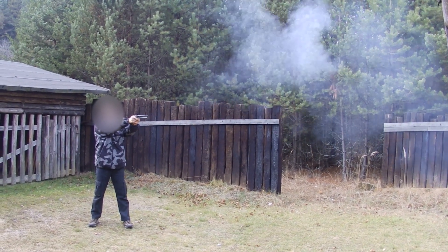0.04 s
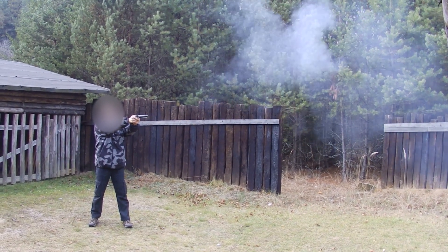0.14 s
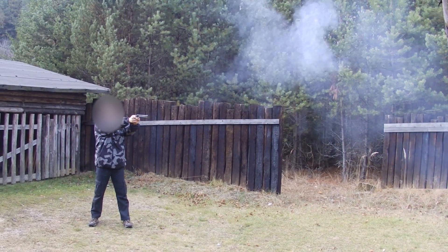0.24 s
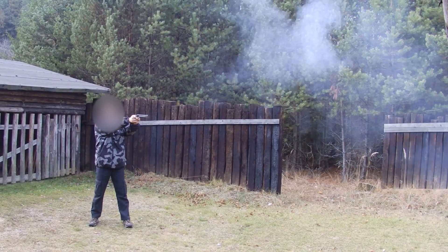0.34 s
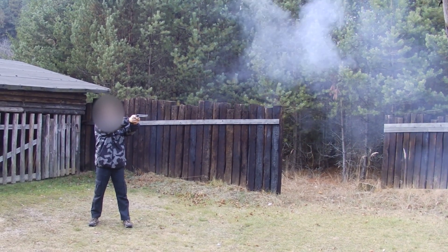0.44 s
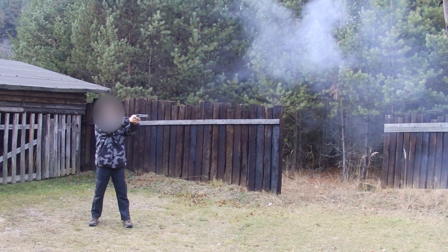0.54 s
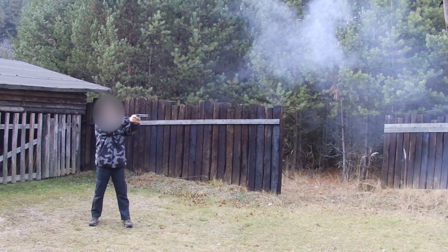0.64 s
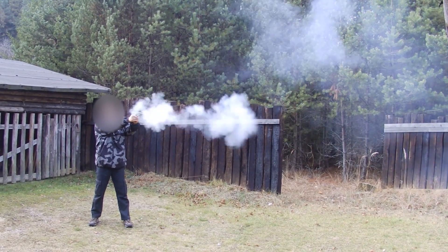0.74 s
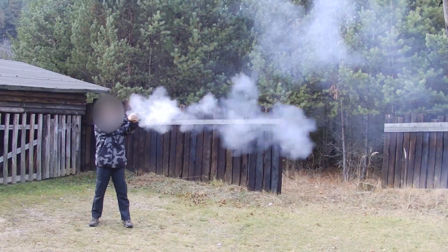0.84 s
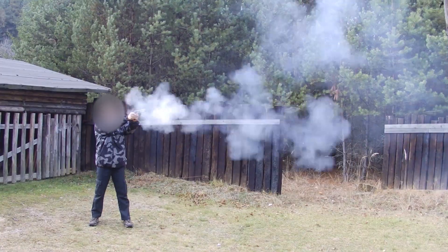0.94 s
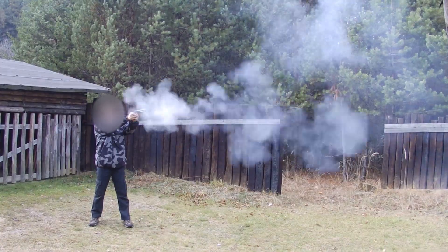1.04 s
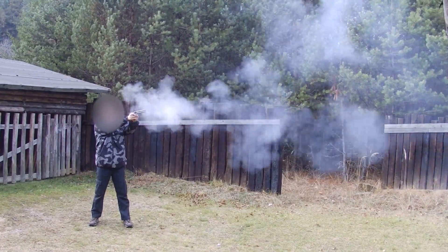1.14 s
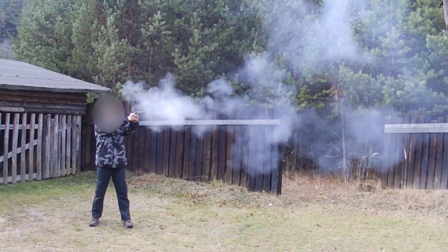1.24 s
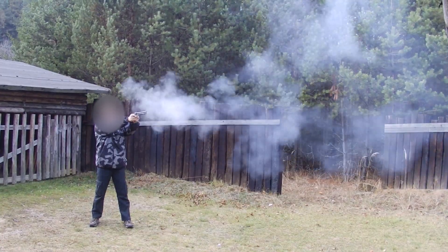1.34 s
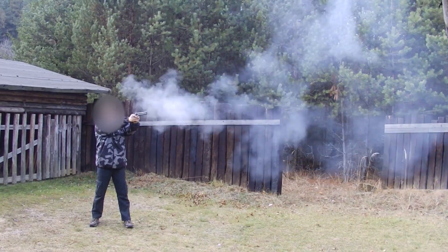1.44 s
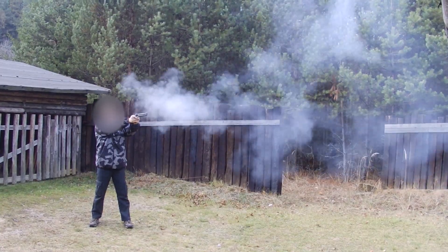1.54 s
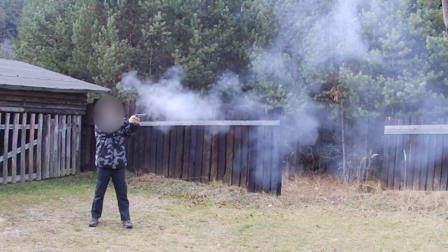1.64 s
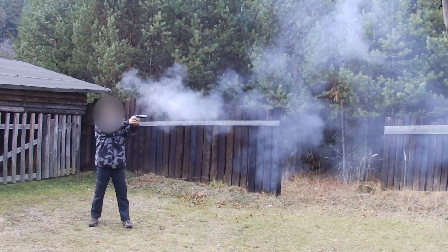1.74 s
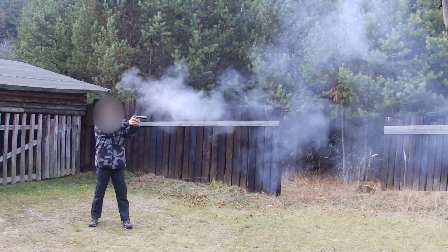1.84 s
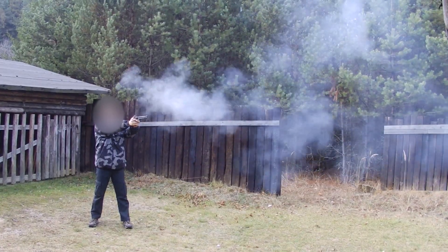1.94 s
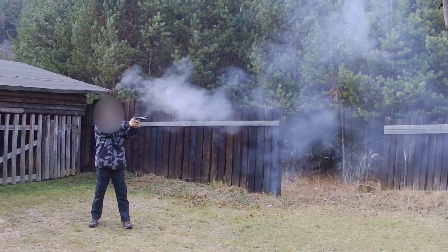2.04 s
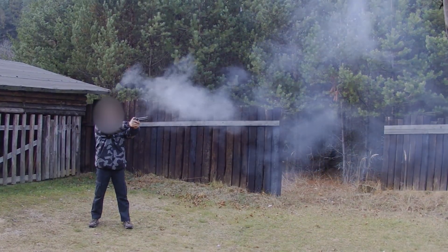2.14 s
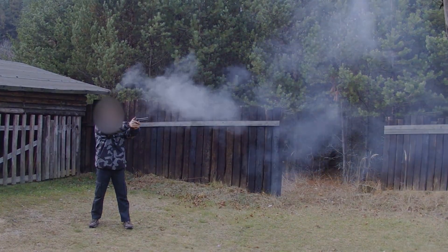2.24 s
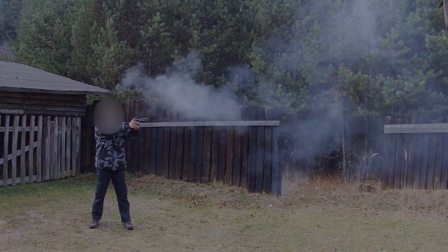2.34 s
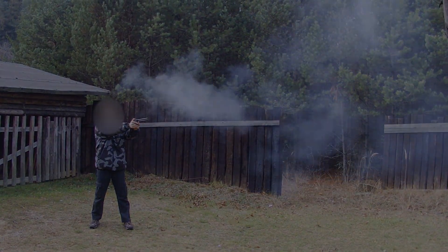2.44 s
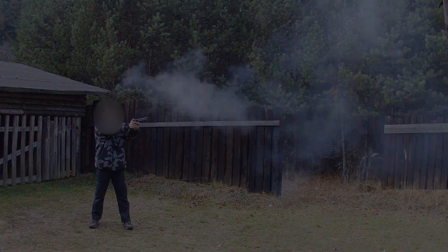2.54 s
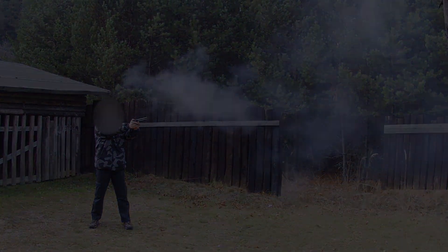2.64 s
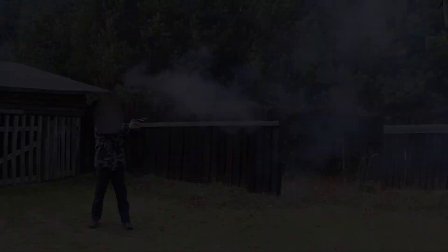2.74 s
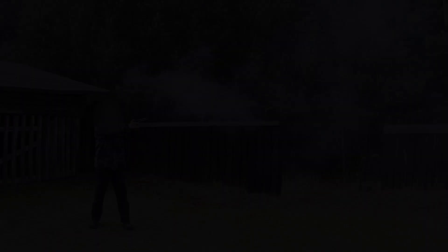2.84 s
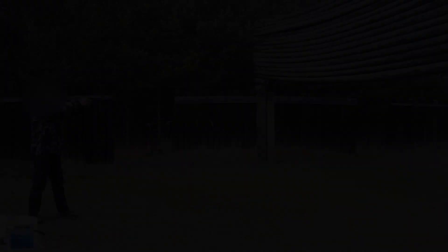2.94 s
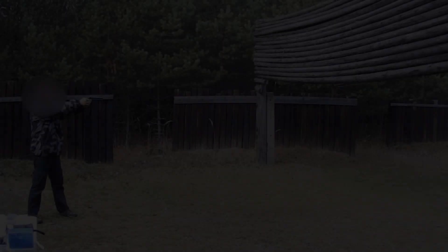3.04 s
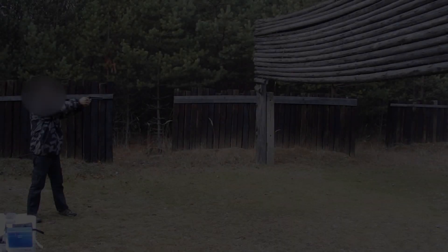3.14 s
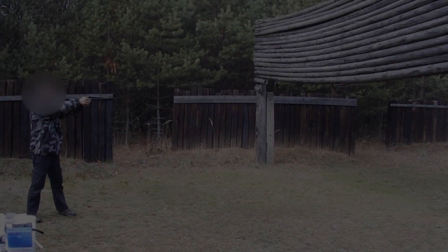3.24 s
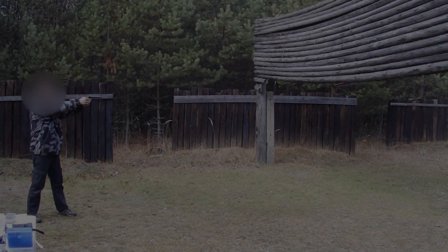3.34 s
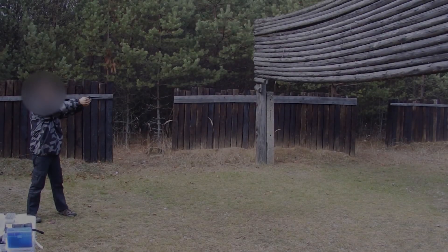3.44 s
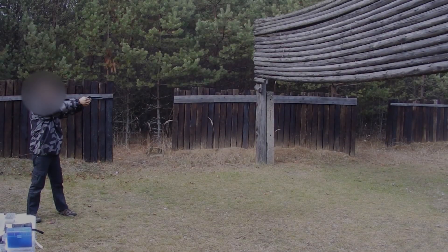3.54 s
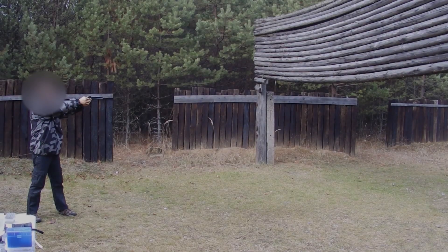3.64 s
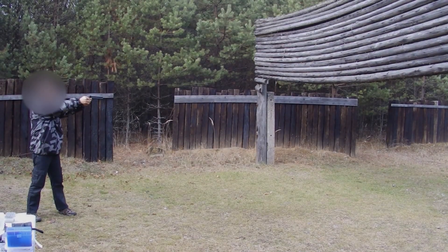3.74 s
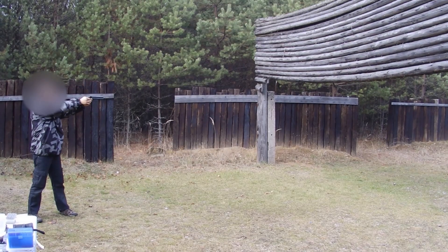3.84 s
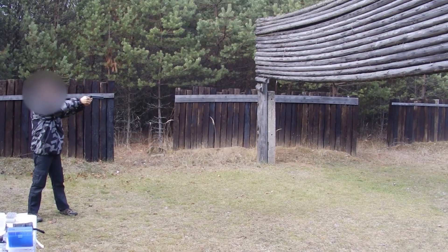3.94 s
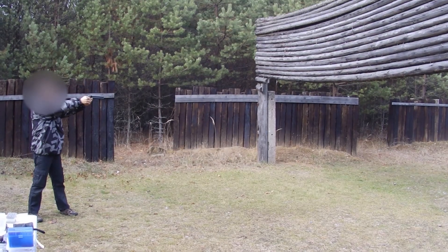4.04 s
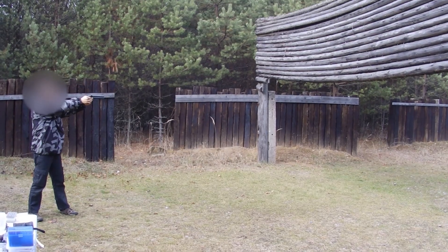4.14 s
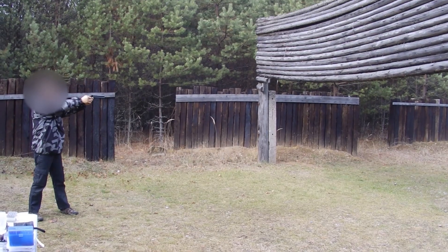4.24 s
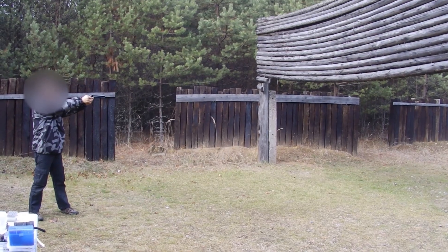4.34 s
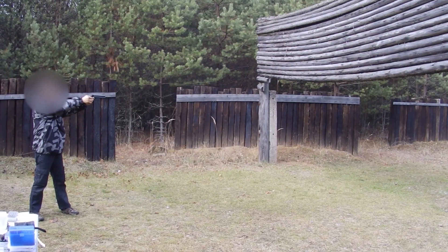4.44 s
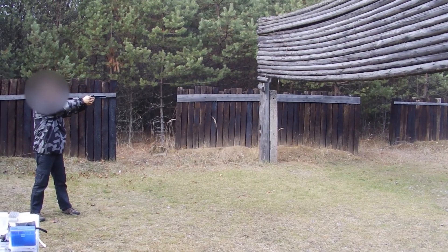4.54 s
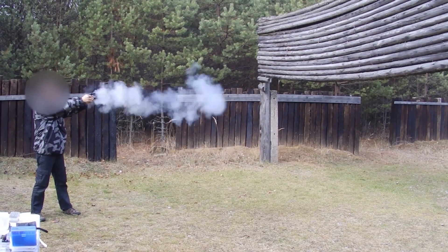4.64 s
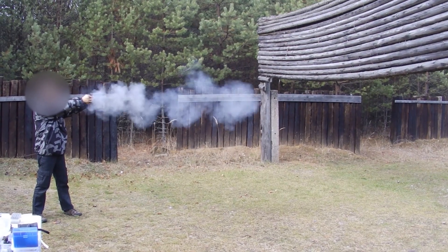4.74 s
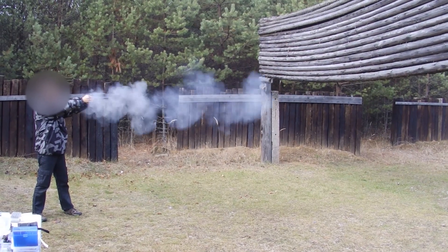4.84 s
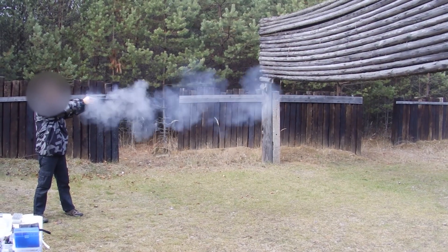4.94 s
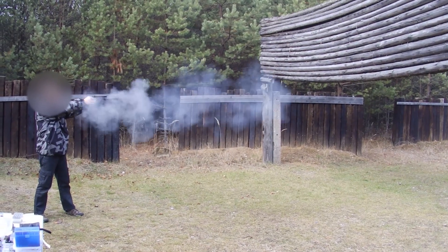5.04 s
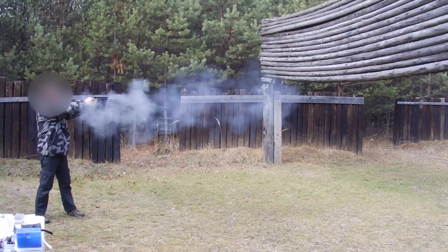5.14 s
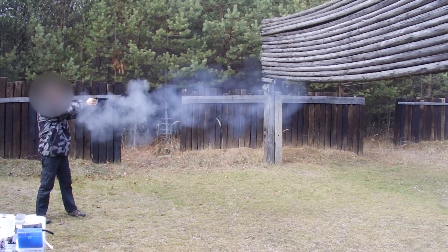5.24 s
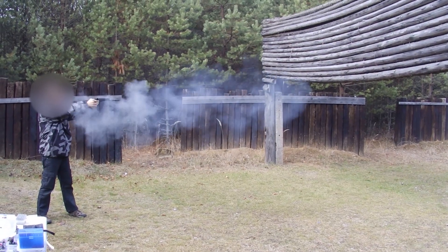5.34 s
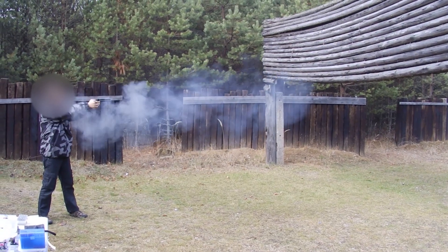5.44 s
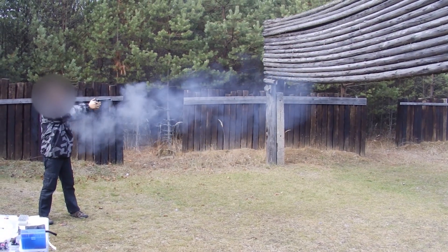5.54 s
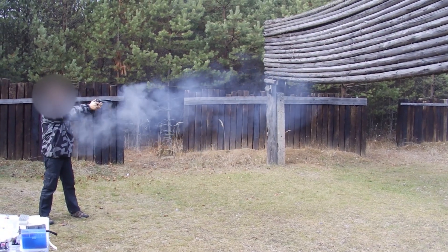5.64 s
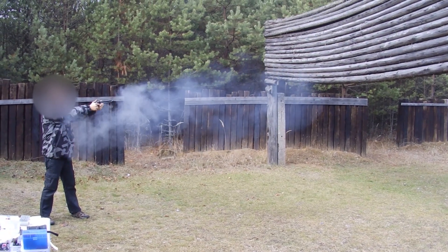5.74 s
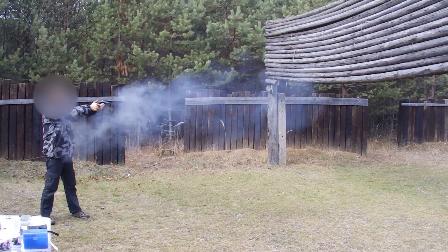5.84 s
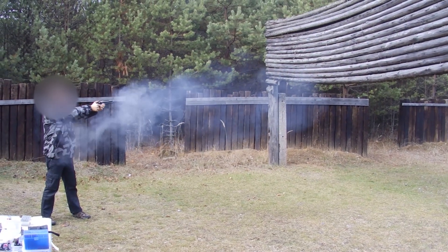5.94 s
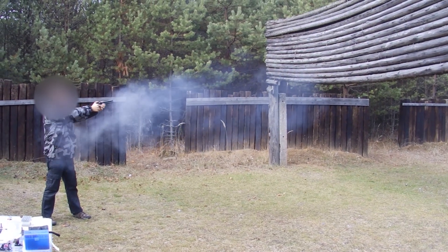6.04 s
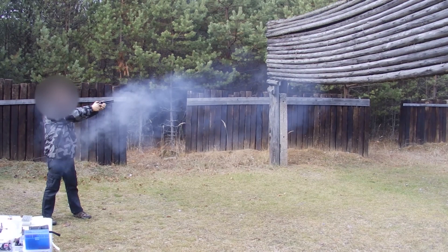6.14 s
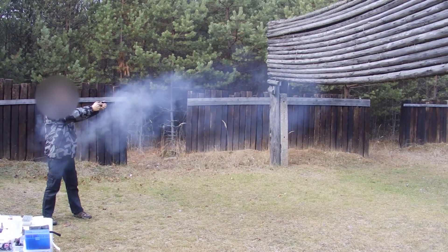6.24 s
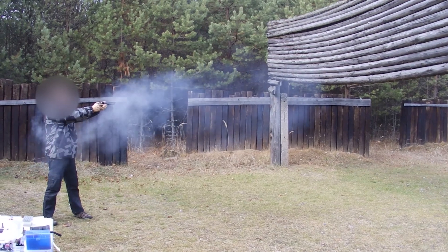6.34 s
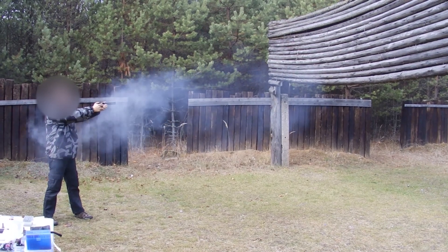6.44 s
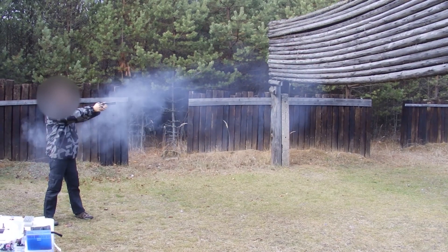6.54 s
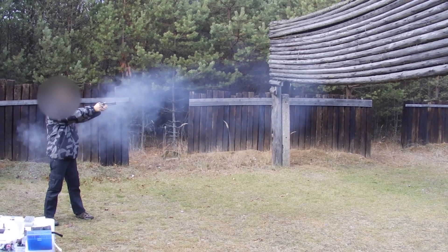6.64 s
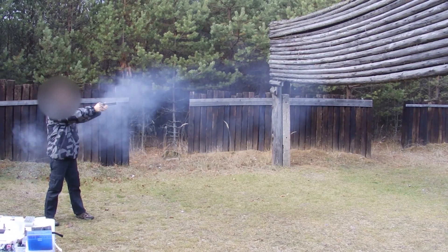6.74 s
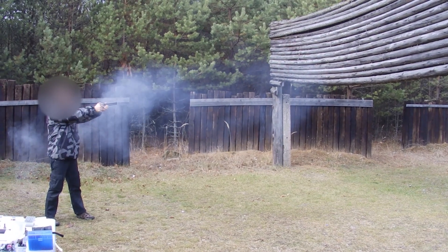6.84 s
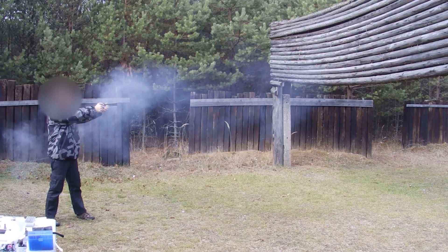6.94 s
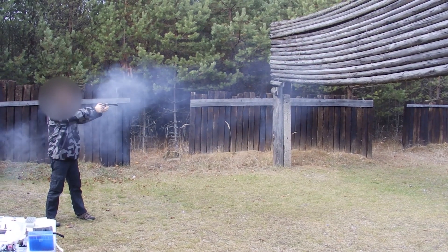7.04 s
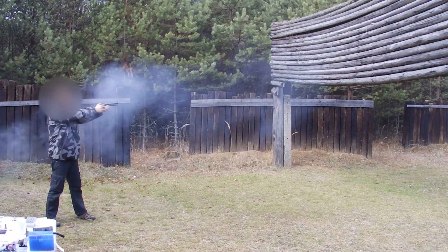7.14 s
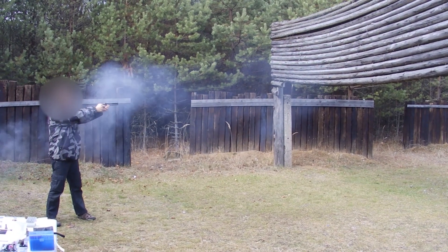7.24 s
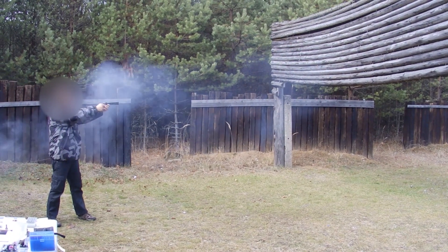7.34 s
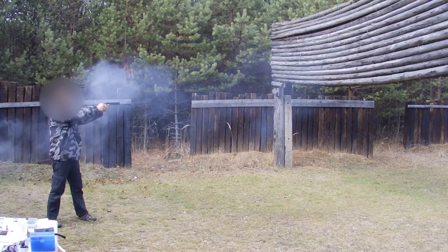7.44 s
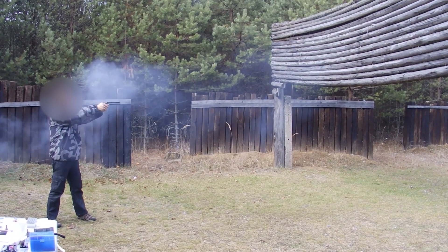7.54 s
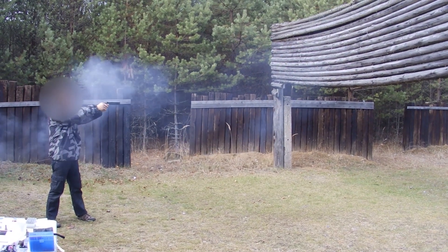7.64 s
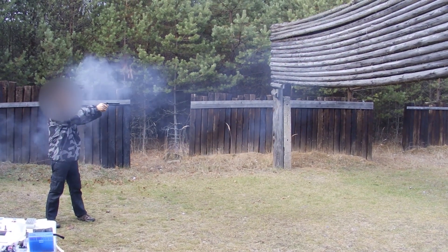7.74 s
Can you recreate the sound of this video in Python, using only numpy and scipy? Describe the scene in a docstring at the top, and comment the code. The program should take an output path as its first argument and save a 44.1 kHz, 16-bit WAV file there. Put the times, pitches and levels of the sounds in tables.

```python
"""Still air, a faint hum and soft knocking from a camera body; then a black powder pistol fires.
Its two shots, four seconds apart, each overload the microphone, slap back off the range's plank fences
and roll away through pine forest. The gain control ducks and slowly recovers, so the echo swells again.
Steel taps follow each shot as the pistol is handled; near the end the hammer clicks back, notch by notch."""
import sys
import numpy as np
from scipy import signal
from scipy.fft import rfft, irfft, next_fast_len
from scipy.io import wavfile
from scipy.ndimage import uniform_filter1d, minimum_filter1d

SR = 44100
rng = np.random.default_rng(int(sys.argv[2]) if len(sys.argv) > 2 else 0)


def put_to_file(sound):
    """Save the sound as 16-bit audio at rate SR, in the file named by the first command-line argument."""
    columns = np.atleast_2d(sound).T  # one column per channel
    safe = np.clip(columns, -1, 1)
    whole_steps = np.round(safe * 32767)
    wavfile.write(sys.argv[1], SR, whole_steps.astype(np.int16))


N = 344057
TIME = np.arange(N) / SR
OVERLOAD_DB = 42.5  # where the microphone saturates


def undb(db):
    """Decibels to gain."""
    return 10 ** (np.asarray(db) / 20)

def curve_at(points, hz):
    """Read a curve on a log-frequency axis."""
    f, value = np.transpose(points)
    return np.interp(np.log(np.maximum(hz, 1)), np.log(f), value)

def noise(colour, size):
    """Noise shaped by an EQ curve, rms 1."""
    eq = undb(curve_at(colour, np.fft.rfftfreq(size, 1 / SR)))
    x = irfft(rfft(rng.standard_normal(size)) * eq, size)
    return x / x.std()

def ring(x, modes):
    """Sum of damped resonances driven by x."""
    return sum(undb(db) * signal.lfilter(*signal.iirpeak(min(hz, SR / 2 - 1), hz / width, SR), x)
               for hz, width, db in modes)

def band(x, hz, width):
    """One resonance applied twice: a band with steep skirts."""
    mode = [(hz, width, 0)]
    return ring(ring(x, mode), mode)

def lowpass(x, hz, order=2):
    """Roll off the top above hz."""
    return signal.sosfilt(signal.butter(order, min(hz, SR / 3), fs=SR, output="sos"), x)

def burst(x):
    """Scale a transient to the energy of 3 ms at rms 1."""
    return x * np.sqrt(.003 * SR / np.sum(x ** 2))

def add(out, s, x):
    """Mix x into out from time s on."""
    i = int(s * SR)
    out[i:i + len(x)] += x[:N - i]


# EQ of the background bed: (frequency [Hz], level [dB])
AIR_COLOUR = [(25, -14), (60, -13), (120, -8), (200, -3), (400, 0.5), (750, -0.5), (1300, -5.5),
              (2100, -14), (3200, -17.5), (5000, -16.5), (7700, -27.5), (11000, -17), (13500, -13.5),
              (16000, -19.5)]

def still_air(level_db=-59.5):
    """A steady bed of still air and microphone hiss."""
    return undb(level_db) * noise(AIR_COLOUR, next_fast_len(N))[:N]


# partials of the hum: (frequency [Hz], rms level [dB])
HUM_PARTIALS = [(59.2, -83), (118.4, -77.5)]

def camera_hum():
    """The camera hums on a low tone and its octave."""
    return sum(undb(db) * np.sqrt(2) * np.sin(2 * np.pi * hz * TIME) for hz, db in HUM_PARTIALS)


# spells of knocking: (start [s], end [s], level [dB])
KNOCK_SPELLS = [(0.122, .75, -53), (3.958, 4.73, -52.5)]

def camera_knocks(per_s=15, centre_hz=342, spread_octaves=.26, spread_db=1.41, rise_s=.004, decay_s=.011):
    """Soft, evenly spaced knocks in the plastic body, each a little different in pitch and weight."""
    out, t = np.zeros(N), TIME[:SR // 10]
    for start, end, db in KNOCK_SPELLS:
        for s in np.arange(start, end, 1 / per_s):
            weight, pitch = rng.standard_normal(2)
            push = rng.standard_normal(len(t)) * (1 - np.exp(-t / rise_s)) * np.exp(-t / decay_s)
            knock = burst(band(push, centre_hz * 2 ** (spread_octaves * pitch), width=550))
            add(out, s, undb(db + spread_db * weight) * knock)
    return out


# ring of the camera case round the microphone: (frequency [Hz], width [Hz], level [dB])
CASE_MODES = [(1540, 270, -3), (2680, 820, 5.5), (4264, 1100, -4), (13200, 3600, -2.5), (14380, 1000, 0.5)]

def shock_front(body_hz, ring_db, scatter_s, edge_db, scatter_db=0):
    """A shock with its suction phase, smeared by rough surfaces, ringing the camera case."""
    t = TIME[:SR // 20]
    age = 2 * np.pi * body_hz * t
    shock = (1 - age) * np.exp(-age)
    scatter = burst(rng.standard_normal(len(t)) * np.exp(-t / scatter_s))
    paths = burst(1. * (t == 0)) + undb(scatter_db) * scatter
    wave = signal.fftconvolve(shock, paths)[:len(t)]
    # grass and wood round the wave; the steep edge survives mainly on the shortest path
    body = lowpass(wave + ring(wave, [(body_hz, body_hz, 3)]), hz=5800, order=4)
    edge = np.diff(burst(shock) + undb(-7) * burst(wave), prepend=0)
    case = ring(wave, CASE_MODES)
    return burst(burst(body) + undb(edge_db) * burst(edge) + undb(ring_db) * burst(case))


# the shots and their tails: (time [s], forest cut-off [s], blast level [dB re overload], body [Hz],
# yard send [dB], yard build-up [s], forest send [dB], forest boom EQ [dB])
PISTOL_SHOTS = [(0.8769, 2.828, -3, 1100, -12, 0.031, -62, -2),
                (4.7587, 7.896, -1.5, 772.5, -12, .022, -61.5, -0.5)]

def blasts(cap_lead_s=.0033, cap_db=-22, ground_lag_s=.0019, ground_db=-9.5):
    """The percussion cap cracks, the muzzle blast hits, and the ground mirrors it just after."""
    out = np.zeros(N)
    for s, _, db, body_hz, *_ in PISTOL_SHOTS:
        cap = shock_front(body_hz=2500, ring_db=-5.5, scatter_s=.0015, edge_db=-10)
        muzzle = shock_front(body_hz, ring_db=8.5, scatter_s=.0014, edge_db=-9.5)
        ground = shock_front(body_hz, ring_db=-1, scatter_s=.0016, edge_db=-9.5)
        add(out, s - cap_lead_s, undb(db + cap_db) * cap)
        add(out, s, undb(db) * muzzle)
        add(out, s + ground_lag_s, undb(db + ground_db) * ground)
    return out


# slapbacks off fences and shed:
# (time [s], level [dB re overload], body [Hz], edge [dB re body], ground bounce [dB re slap])
FENCE_SLAPS = [(0.8927, -5.5, 480.6, -8.5, -4.5), (0.9127, -16, 800, -10.5, -1.5),
               (0.925, -12.5, 800, -18, -18), (4.7646, -11, 402, -11, 3), (4.7746, -10.5, 760, -17, -1),
               (4.7865, -12, 743, -25, -16.5), (4.8021, -17, 750, -20, -13)]

def fence_slaps(bounce_lag_s=.0033, ring_loss_db_per_s=319):
    """Each plank wall answers twice: straight, then slightly lower in pitch, duller and more smeared by way of
    the ground."""
    out = np.zeros(N)
    for s, db, hz, edge_db, bounce_db in FENCE_SLAPS:
        detour_s = min(abs(s - shot[0]) for shot in PISTOL_SHOTS)
        ring_db = 2.5 - ring_loss_db_per_s * detour_s  # late slaps ring the case less
        slap = shock_front(hz, ring_db, scatter_s=.0016, edge_db=edge_db, scatter_db=2)
        bounce = shock_front(.95 * hz, ring_db - 2.5, scatter_s=.002, edge_db=edge_db - 5.5, scatter_db=2)
        add(out, s, undb(db) * slap)
        add(out, s + bounce_lag_s, undb(db + bounce_db) * bounce)
    return out


# EQ of sound thrown back by planks: (frequency [Hz], level [dB])
PLANK_COLOUR = [(30, -24), (70, -11.5), (150, -2), (280, -1), (750, 0.5), (1500, -3), (2000, -12),
                (2700, -5.5), (4000, -12.5), (5500, -16), (8000, -31), (13000, -30.5), (16000, -44.5)]

def yard_scatter(t, build_s, t60=.2491, grain_db=1.5):
    """A short, grainy reverb: dense scatter between fences, shed and ground."""
    steps = np.repeat(rng.standard_normal(len(t)), SR // 300)[:len(t)]
    grain = uniform_filter1d(steps, SR // 600)
    build_up = 1 - np.exp(-(t / build_s) ** 2)
    return noise(PLANK_COLOUR, len(t)) * undb(grain_db * grain - 60 * t / t60) * build_up


# EQ of sound thrown back by trees: (frequency [Hz], level [dB])
TREE_COLOUR = [(30, -39), (80, -17.5), (150, -10), (250, -4), (520, -0.5), (900, 0), (1500, -1.5),
               (2050, -7.5), (2700, -3.5), (3600, -11.5), (5500, -17.5), (8000, -32), (15000, -45.5)]
# damping by soft ground, air and foliage: (frequency [Hz], loss [dB/s])
FOREST_DAMPING = [(100, 15.5), (200, 10), (450, 6.5), (1000, 10.5), (2000, 12), (3000, 19), (5000, 25.5),
                  (8000, 40), (15000, 62)]

def forest_echo(t, boom_db, onset_s=.06, grain_db=.77, boom_hz=321, boom_octaves=.47, rim_db=4.5, rim_s=.75):
    """The long tail: countless trunk echoes fall as 1 / distance and lose their treble on the way."""
    size = next_fast_len(len(t))
    hz = np.fft.rfftfreq(size, 1 / SR)
    trunks = rng.standard_normal(size)
    trunks *= undb(grain_db * np.repeat(rng.standard_normal(size // 64 + 1), 64)[:size])
    boom_bell = np.exp(-(np.log2(np.maximum(hz, 1) / boom_hz) / boom_octaves) ** 2)
    spectrum = rfft(trunks) * undb(curve_at(TREE_COLOUR, hz) + boom_db * boom_bell)
    spectrum /= irfft(spectrum, size).std()
    centres = np.geomspace(100, 16000, 16)
    tail = 0
    for centre, share in zip(centres, np.eye(len(centres))):  # each band dies at its own rate
        echoes = irfft(spectrum * curve_at(np.c_[centres, share], hz), size)[:len(t)]
        tail += echoes * undb(-curve_at(FOREST_DAMPING, centre) * t)
    spreading = t ** 2 / (t ** 3 + onset_s ** 3)
    rim = undb(rim_db * np.exp(-t / rim_s))  # the dense rim answers more strongly than the depths
    return tail * spreading * rim

def shot_tails(fade_s=.004):
    """Each shot sets off yard and forest; a quick fade ends the forest tail at its cut-off."""
    out = np.zeros(N)
    for s, end, _, _, yard_db, build_s, forest_db, boom_db in PISTOL_SHOTS:
        t = TIME[:int((end - s) * SR)]
        fade = np.minimum((t[-1] - t) / fade_s, 1)
        add(out, s, undb(yard_db) * yard_scatter(t, build_s))
        add(out, s, undb(forest_db) * forest_echo(t, boom_db) * fade)
    return out


# late returns of the shots: (time [s], level [dB re overload], centre [Hz])
FAR_RETURNS = [(1.18, -51, 2000), (5.058, -48.5, 1920), (5.2768, -57.5, 2680)]

def far_knocks(decay_s=.0014):
    """Dull knocks come back from far down the range."""
    out, t = np.zeros(N), TIME[:SR // 20]
    for s, db, hz in FAR_RETURNS:
        knock = band(rng.standard_normal(len(t)) * np.exp(-t / decay_s), hz, width=1100)
        add(out, s, undb(db) * burst(lowpass(knock, hz=5000)))
    return out


# ring of the pistol's steel lock: (frequency [Hz], width [Hz], level [dB])
LOCK_MODES = [(1603, 600, 1.5), (2590, 493, 18), (3160, 390, 1), (3810, 450, 2.5), (4585, 120, 1),
              (5260, 98, 4), (5800, 93, -3)]

def steel_click(hz, snap_db, echo_db, scrape_s=.00245, snap_s=.00178, echo_t60=.65, detune=.024):
    """A steel part snaps home, rings the lock and echoes faintly off the fences."""
    t = TIME[:SR // 3]
    scrape, snap, echo = rng.standard_normal((3, len(t)))
    contact = burst(1. * (t == 0)) + undb(-2) * burst(scrape * np.exp(-t / scrape_s))
    echo *= undb(-60 * t / echo_t60)
    # each part rings a little differently and favours the modes near its own pitch
    modes = [(f * (1 + detune * rng.standard_normal()), width, db) for f, width, db in LOCK_MODES]
    steel, echo = (burst(lowpass(band(ring(push, modes), hz, width=hz), hz=6500, order=4))
                   for push in (contact, echo))
    snap = burst(band(snap * np.exp(-t / snap_s), hz=12500, width=6500))
    return steel + undb(snap_db) * snap + undb(echo_db) * echo


# handling foley: (time [s], level [dB], centre [Hz], echo send [dB])
HANDLING_TAPS = [(2.0431, -22.5, 1950, -9), (2.0863, -33, 3420, 4.5), (2.4626, -42, 1600, -1),
                 (5.9745, -48, 4500, 3.5), (6.057, -37.5, 3610, 3.5), (6.8846, -55.5, 4600, -5)]

def handling():
    """Light, blunt taps of steel as the pistol is handled."""
    out = np.zeros(N)
    for s, db, hz, echo_db in HANDLING_TAPS:
        add(out, s, undb(db) * steel_click(hz, snap_db=-37, echo_db=echo_db))
    return out


# one catch per notch: (time [s], level [dB], centre [Hz], bright snap [dB], echo send [dB])
HAMMER_NOTCHES = [(6.3144, -39.5, 4950, -5.5, -4), (6.3487, -38, 4080, -28, -2),
                  (6.406, -41.5, 5700, -3, -15)]

def cocking(seat_lag_s=.0029, seat_db=1.5, seat_snap_db=-14):
    """The hammer is drawn back: each notch catches, then the spring seats the part with a blunter click."""
    out = np.zeros(N)
    for s, db, hz, snap_db, echo_db in HAMMER_NOTCHES:
        add(out, s, undb(db) * steel_click(hz, snap_db, echo_db))
        add(out, s + seat_lag_s, undb(db + seat_db) * steel_click(hz, snap_db + seat_snap_db, echo_db))
    return out


def scene():
    """The mono mix: hot gunfire, small steel clicks and camera noises over still air."""
    air = still_air()
    gunfire = undb(OVERLOAD_DB) * (blasts() + fence_slaps() + far_knocks() + shot_tails())
    return (air + gunfire + handling() + cocking() + camera_hum() + camera_knocks())[None]

def record(dry, ceiling_db=-7, recovery_db_per_s=26.5, low_cut_hz=35, top_hz=16000):
    """The microphone saturates; the gain control ducks at once and climbs back at a steady rate."""
    saturated = undb(OVERLOAD_DB) * np.tanh(dry[0] / undb(OVERLOAD_DB))
    peak = -minimum_filter1d(-np.abs(saturated), size=SR // 140)
    excess_db = np.maximum(20 * np.log10(peak + 1e-12) - ceiling_db, 0)
    recovery_db = recovery_db_per_s * TIME
    duck_db = np.maximum.accumulate(excess_db + recovery_db) - recovery_db
    ducked = saturated * undb(-duck_db)
    thinned = signal.lfilter(*signal.butter(1, low_cut_hz, "high", fs=SR), ducked)
    return signal.sosfilt(signal.ellip(10, .2, 75, top_hz, fs=SR, output="sos"), thinned)[None]


dry = scene()
out = record(dry)
put_to_file(out)
```